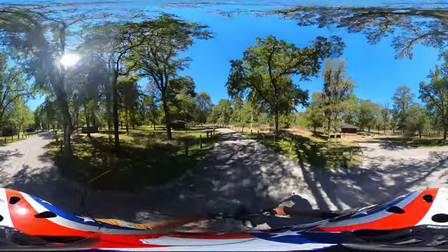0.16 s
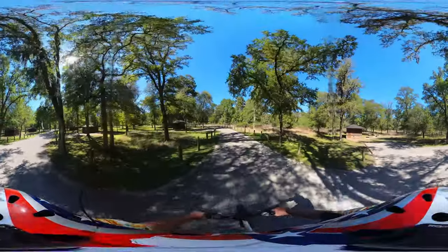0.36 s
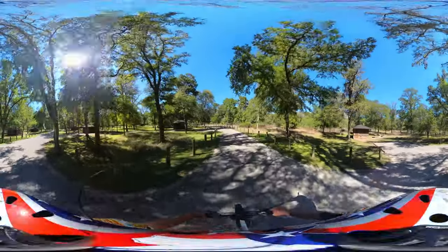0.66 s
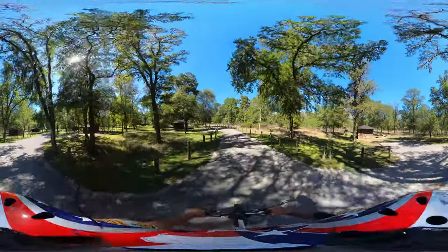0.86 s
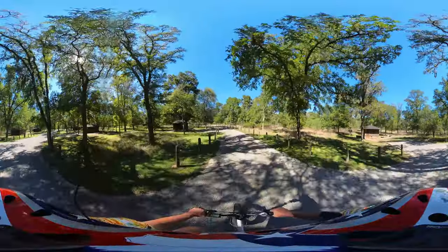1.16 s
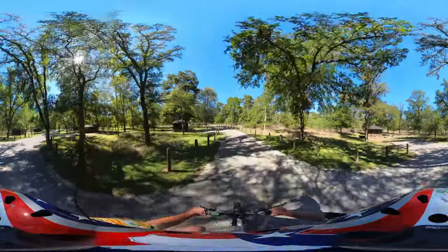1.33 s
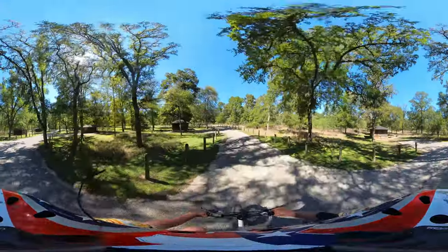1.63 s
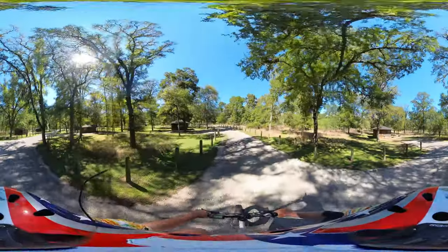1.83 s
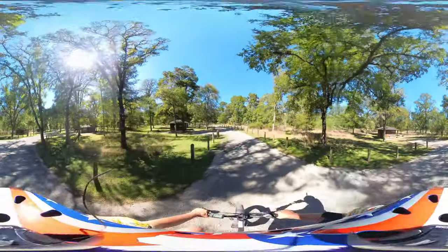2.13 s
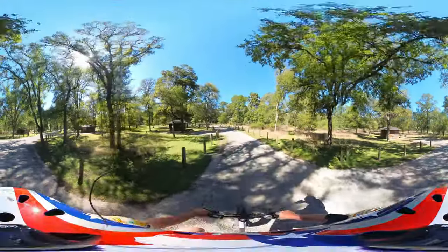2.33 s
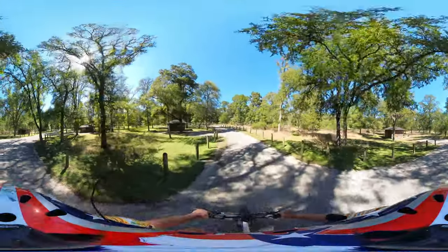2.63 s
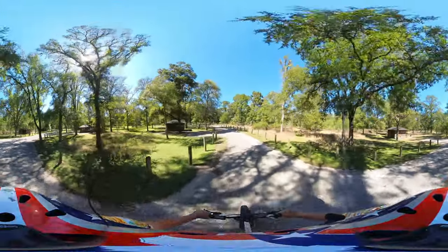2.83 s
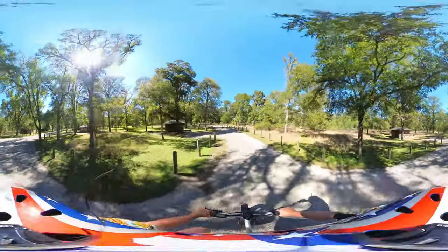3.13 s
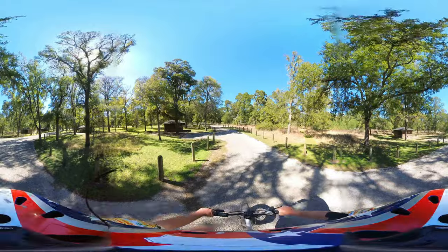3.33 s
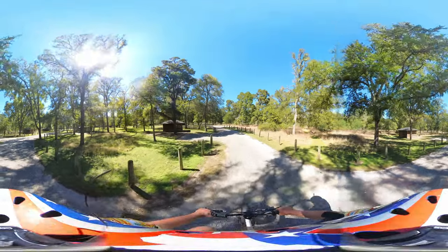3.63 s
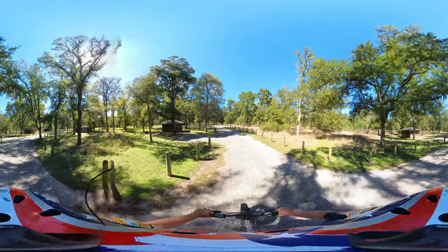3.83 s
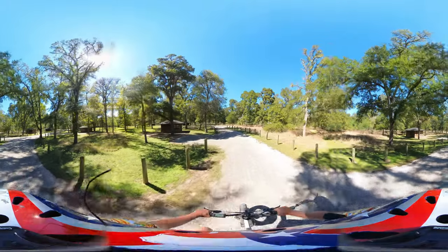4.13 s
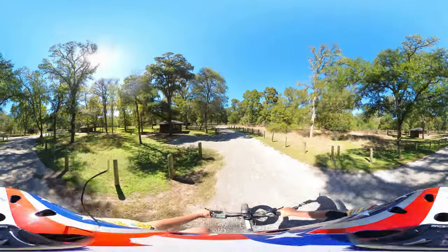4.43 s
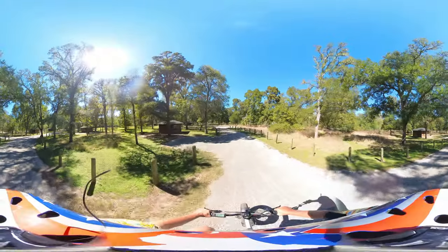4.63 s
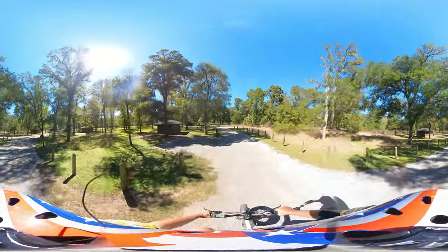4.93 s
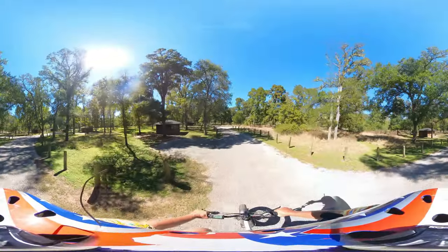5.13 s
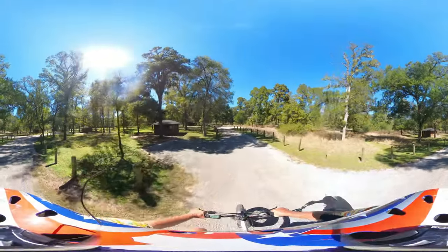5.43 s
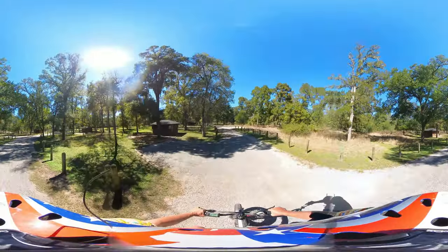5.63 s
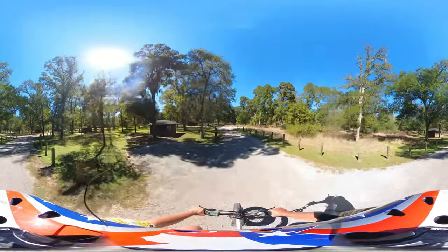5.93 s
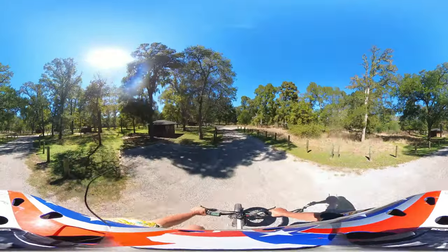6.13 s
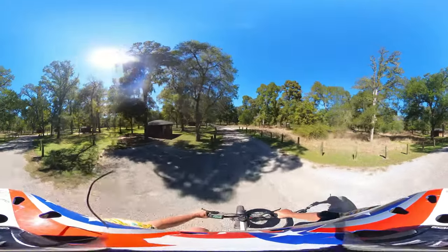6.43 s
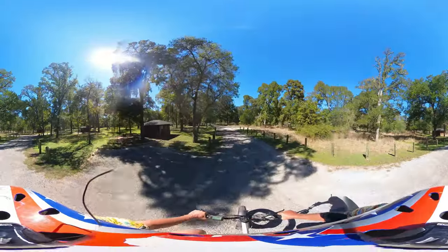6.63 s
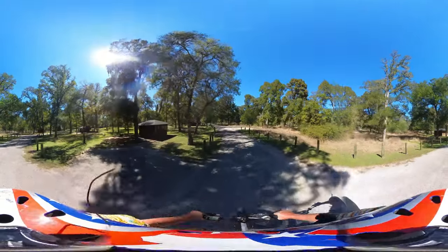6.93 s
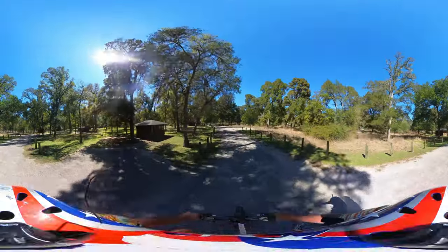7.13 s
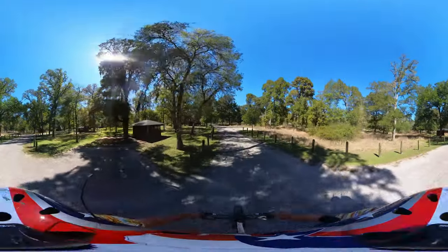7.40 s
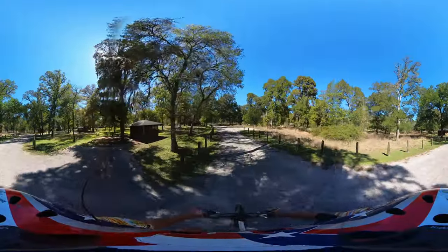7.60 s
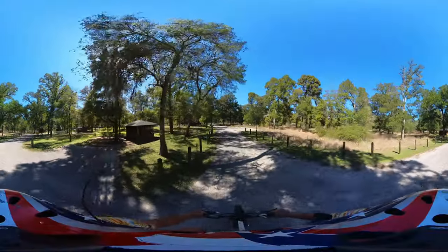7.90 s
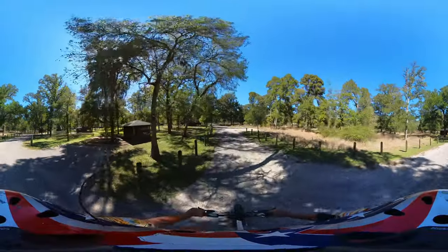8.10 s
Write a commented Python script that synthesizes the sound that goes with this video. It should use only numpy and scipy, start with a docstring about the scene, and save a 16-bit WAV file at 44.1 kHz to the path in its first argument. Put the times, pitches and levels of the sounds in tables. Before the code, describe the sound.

Outdoors on a gravel road, a bicycle coasts along. Low, muttering tyre crunch runs throughout beneath lumpy, low wind noise at the microphone. Glassy high brake squeaks and tiny chirps recur every half second, varying in strength. Stones click and tock, most sharply near one second and just after seven, and a few dull thuds come from ruts. Wind calms later and returns slightly at the end.

```python
"""Bicycle tyres coast along a gravel road, heard close up from a camera microphone on the rider's helmet.
Random impacts through the tread's colour make the crunch; pebble ticks make the grit, single blows the stones.
Shaped noise makes the wind at the microphone. A slightly warped brake disc rubs its pads in gliding tones:
a run of squeaks and a higher chirp on most turns of the wheel, thrown back by near surfaces and later by trees.
Stones click, ruts thud, and a faint wavering whirr comes and goes."""
import sys
import numpy as np
from scipy import signal
from scipy.fft import rfft, irfft
from scipy.io import wavfile
from scipy.ndimage import uniform_filter1d

SR = 44100
rng = np.random.default_rng(int(sys.argv[2]) if len(sys.argv) > 2 else 0)


def generate_wav(signal):
    """Clip the signal to [-1, 1] and save it as 16-bit WAV at the path in sys.argv[1]."""
    frames = np.transpose(np.atleast_2d(signal))
    scaled = np.clip(frames, -1, 1) * 32767
    pcm = np.round(scaled).astype(np.int16)
    wavfile.write(sys.argv[1], SR, pcm)


N = 364266
T = np.arange(N) / SR  # time/s

# Levels marked "rel." are trimmed further where they are used.
# ground under the tyres: [t/s, crunch level/dB rel., loose grit level/dB rel.]
ROAD_SURFACE = [(0, -39, -70.5), (0.6, -41, -70), (1.1, -41, -69.5), (1.8, -42.5, -77), (2.4, -43, -74),
                (2.7, -44, -79.5), (2.88, -42.5, -69.5), (3.05, -42, -75.5), (3.75, -43.5, -78),
                (4.6, -42, -74.5), (4.87, -43, -68), (5.05, -41, -80.5), (5.35, -43, -75),
                (5.55, -42.5, -80), (7.6, -41, -73.5), (8.25, -40, -69.5)]
# air on the microphone: [t/s, buffeting level/dB rel.]
WIND_LEVELS = [(0, -23.5), (0.66, -22.5), (0.85, -26.5), (1.57, -28), (1.77, -25.5), (2.15, -23.5),
               (2.22, -31.5), (2.48, -30), (2.56, -24), (2.92, -24), (3.3, -30.5), (3.64, -24),
               (3.95, -32.5), (4.7, -36.5), (5.2, -34.5), (6.25, -38), (7.25, -31.5), (8.25, -28)]
# short gusts on top of it: [t/s, half length to 1/e in s, rise/dB]
SHORT_GUSTS = [(0.697, 0.054, 3.5), (3.153, 0.026, 7), (6.698, 0.085, 8.5), (8.067, 0.018, 8.5)]
# turns of the wheel, timed where the warp of the disc meets the pad:
# [t/s, lead-in level/dB, squeak level at the warp/dB, drag afterwards level/dB, chirp level/dB rel.]
WHEEL_TURNS = [(0.047, -70, -56, -71, -41), (0.516, -51, -66, -64, -42.5), (0.996, -49, -38.5, -48.5, -41),
               (1.473, -68, -62, -48, -49.5), (1.957, -50.5, -26.5, -41.5, -48),
               (2.438, -70, -57, -66, -46), (2.929, -55, -50, -56.5, -46.5), (3.411, -54, -35, -36.5, -41),
               (3.884, -45.5, -32, -62, -39.5), (4.379, -44, -31.5, -52, -52),
               (4.862, -32.5, -26, -40.5, -66), (5.355, -56, -43.5, -52.5, -44.5),
               (5.839, -50, -42.5, -53.5, -41), (6.306, -51, -36, -35.5, -40), (6.764, -43, -54, -51, -49),
               (7.226, -45, -35.5, -58, -66), (7.675, -53, -37.5, -48, -66), (8.131, -59, -66, -75, -73)]
# thin stray peeps: [t/s, level/dB rel., f/Hz]
STRAY_PEEPS = [(5.621, -58, 10000), (5.708, -54, 9900), (5.709, -54, 8300), (5.775, -58, 8070),
               (6.895, -50, 9850), (7.015, -54.5, 10120)]
# modes the disc rings with: [f/Hz, level/dB rel., t60/s]
DISC_MODES = [(6970, 20, .2), (7300, 14, 0.26), (7462, -9, .2), (7600, -3.5, .25)]
# larger stones squeezed out from under a tyre: [t/s, peak level/dB rel.]
STONE_POPS = [(0.047, -23), (0.221, -22), (0.597, -21.5), (1.029, -10.5), (3.252, -18), (3.975, -27),
              (4.341, -26), (4.494, -27), (4.522, -23), (4.568, -24.5), (4.665, -29), (5.31, -22),
              (5.393, -26.5), (6.095, -25), (7.177, -25), (7.3, -7), (7.53, -23), (7.708, -28.5),
              (7.824, -25), (7.919, -27), (8.004, -23), (8.115, -23), (8.241, -14.5)]
# stones that click on each other or on the bike: [t/s, clack level/dB rel., tick level/dB rel.]
STONE_CLICKS = [(0.5236, -36, -58), (0.551, -40, -51.5), (0.64, -37, -44.5), (0.696, -38.5, -67),
                (0.9066, -37, -58), (1.0303, -40, -52), (2.0557, -45.5, -54.5), (2.2273, -64, -54.5),
                (3.0683, -35, -48.5), (3.1814, -40.5, -61), (3.2723, -47, -59), (3.3186, -50, -56),
                (4.341, -42, -57), (4.5226, -44.5, -59), (4.568, -41, -62), (4.9434, -49, -54),
                (5.3093, -48, -64), (6.7675, -51, -61), (7.1766, -52, -54.5), (7.301, -29.5, -42.5),
                (7.3756, -40.5, -52.5), (7.4562, -39, -51)]
# knocks of the wheel into ruts: [t/s, peak level/dB]
RUT_BUMPS = [(.690, -11), (2.014, -8.5), (5.881, -14.5)]
# spells of a thin whirr, perhaps insects in the trees: [start t/s, length/s, level/dB rel.]
WHIRR_SPELLS = [(3.1, 0.57, -69), (4.05, 0.47, -74.5), (5.407, 0.49, -73.5), (5.943, .6, -70)]

# Colours, all [f/Hz, spectral density level/dB rel.]
# mutter of the tyre casing on the gravel
CRUNCH_COLOUR = [(150, -20), (330, -4.5), (410, 6.5), (500, 2), (720, -2.5), (950, -2), (1170, -3),
                 (1500, -17.5), (1900, -23.5), (2600, -38), (4000, -76)]
# loose grit
GRIT_COLOUR = [(1500, -7), (2200, 4), (2900, -1.5), (3600, -0.5), (4300, -6.5), (6000, -3.5), (6700, -4),
               (8300, -0.5), (9600, -1.5), (10500, -12), (11500, -23.5)]
# wind buffeting
BUFFET_COLOUR = [(40, -24.5), (90, -1), (130, 1.5), (190, -0.5), (260, -6.5), (340, -18.5), (500, -24.5),
                 (900, -36.5), (2000, -79)]
# deep wind rumble
RUMBLE_COLOUR = [(10, -38.5), (25, -12), (38, 0), (52, 5.5), (80, -2.5), (120, -12.5)]
# tyre casing answering a popped stone
POP_COLOUR = [(100, -23), (400, -10.5), (650, -4.5), (1000, 1), (1230, -1), (1500, -12.5), (2000, -20.5),
              (3200, -35)]
# body of a clicking stone
STONE_COLOUR = [(1200, 7.5), (2500, -10.5), (4000, -4), (5500, -1.5), (7500, 0.5), (9000, -16)]
# sharp edge of a stone, also the hiss of the pad
CHIP_COLOUR = [(4000, -33), (7000, -6), (8500, 6), (9700, 2), (10700, -10), (12000, -26), (15000, -59)]

# spray of grit after each click: level against the clack/dB, decay to 1/e in s
SPRAY_DB, SETTLE_S = -35.5, 0.066
# from the start of a brake tone to the middle of its swell
LEAD_S = .04
SPOKES = 8
# the rub builds quickly towards the warp and lets go slowly, both in dB per spoke;
# after the warp no two spokes rub alike (random spread/dB)
BUILD_DB, RELEASE_DB, UNEVEN_DB = 14.5, 3, 1
# away from the warp the spokes only graze the pad: lowest rub level/dB
GRAZE_DB = -64.5
# the pad slips into a higher chirp just after the squeak at the warp
CHIRP_HZ, CHIRP_AFTER_S = 8350, .03
# and scrapes briefly just before it; level against that squeak/dB rel.
SCRAPE_HZ, SCRAPE_BEFORE_S, SCRAPE_DB = 7550, 0.024, -18.5
# smaller stones pop at random: how many, and their range of peak levels/dB rel.
SMALL_POPS, SMALL_POP_DB = 18, (-38.5, -29)
# upper band limit of the camera
EDGE_HZ = 14500


def amp(db):
    """Decibels to gain."""
    return 10 ** (np.asarray(db) / 20)


def unit(x):
    """Scales to rms 1."""
    return x / np.sqrt(np.mean(x ** 2) + 1e-20)


def curves(rows):
    """Each column of a table of times, interpolated at every sample."""
    s, *columns = np.transpose(rows)
    return [np.interp(T, s, column) for column in columns]


def add(mix, s, sound):
    """Lays a sound into the mix at a time."""
    part = mix[max(round(s * SR), 0):][:len(sound)]
    part += sound[:len(part)]


def blows(rows, response):
    """One response, peak 1, struck once for each row."""
    out = np.zeros(N)
    for s, db in rows:
        add(out, s, amp(db) * response / abs(response).max())
    return out


def ring(points, size=4096):
    """The causal impulse response of a colour, energy 1; it falls away steeply above its last point."""
    f, db = np.transpose(points)
    hz = abs(np.fft.fftfreq(size, 1 / SR))
    skirt_db = np.clip(60 * np.log2((hz + 1) / f[-1]), 0, 80)
    log_gain = np.log(amp(np.interp(np.log(hz + 1), np.log(f), db) - skirt_db))
    # minimum phase: the Hilbert transform of the log gain
    spectrum = np.exp(np.conj(signal.hilbert(log_gain)))
    response = np.fft.ifft(spectrum).real[:size // 2]
    response = response * np.hanning(size)[size // 2:]
    return response / np.linalg.norm(response)


def through(x, response):
    """Convolves and keeps the length."""
    return signal.oaconvolve(x, response)[:len(x)]


def shaped_noise(gain):
    """White noise weighted by a gain at each frequency, rms 1."""
    return unit(irfft(rfft(rng.standard_normal(N)) * gain, N))


def wander(rate_hz):
    """Smooth chance of rms 1, up to about a rate."""
    hz = np.fft.rfftfreq(N, 1 / SR)
    return shaped_noise(np.exp(-(hz / rate_hz) ** 2))


def band(centre_hz, width_hz):
    """Noise in one smooth resonance, rms 1."""
    hz = np.fft.rfftfreq(N, 1 / SR)
    return shaped_noise(np.exp(-.5 * ((hz - centre_hz) / width_hz) ** 2))


def scatter(t60, delay):
    """A tail of random echoes, energy 1; it starts after a delay/s and dies over t60/s."""
    t = T[:SR // 2]
    tail = rng.standard_normal(len(t)) * amp(-60 * t / t60) * (t > delay)
    return tail / np.linalg.norm(tail)


def patchy(x, depth_db, size=256):
    """Lets the colour drift: each narrow band swells and sinks on its own."""
    bands = signal.stft(x, nperseg=size)[2]
    field = rng.standard_normal(bands.shape)
    field = uniform_filter1d(field, size=3, axis=0)
    field = uniform_filter1d(field, size=36, axis=1)
    return signal.istft(bands * amp(depth_db * unit(field)), nperseg=size)[1][:N]


def grains(per_s, spread_db):
    """Random tiny impacts, most small and a few large, rms 1."""
    hits = rng.random(N) < per_s / SR
    signs = rng.choice([-1, 1], N)
    sizes = amp(spread_db * np.minimum(rng.exponential(1, N), 4))
    return unit(hits * signs * sizes)


def pebbles(count=32):
    """Each size of pebble ticks at its own pitch for a few cycles, and rattles against its neighbours."""
    t = T[:SR // 100]
    out = np.zeros(N)
    for hz in rng.uniform(2000, 10700, count):
        tick = np.sin(2 * np.pi * hz * t) * t * np.exp(-t / 0.0001)
        rattle = np.convolve(tick, scatter(t60=0.024, delay=0)[:SR // 16])
        out += through(grains(per_s=36, spread_db=3.5), rattle)
    return unit(out)


def tyres():
    """Stones shift under the tread: the casing mutters, grit crackles in clumps and sprays after each click."""
    crunch_db, grit_db = curves(ROAD_SURFACE)
    clump = wander(19.4)
    tread = unit(grains(per_s=1400, spread_db=3.0) + .5 * rng.standard_normal(N))
    crunch = through(tread, ring(CRUNCH_COLOUR)) * amp(crunch_db + 2.5 + 1.31 * clump)
    dust = patchy(rng.standard_normal(N), depth_db=7) * amp(0.7)
    crackle = pebbles() * amp(-1 + 6.14 * clump)
    spray_rows = [(s, db + SPRAY_DB) for s, db, _ in STONE_CLICKS]
    spray = blows(spray_rows, np.exp(-T[:SR // 2] / SETTLE_S))
    grit = through(dust + crackle, ring(GRIT_COLOUR)) * np.hypot(amp(grit_db), spray)
    return crunch + grit


def wind(rumble_db=-32, rumble_share=0.76, eddies_db=-12, eddies_hz=270):
    """Air shed by the helmet: lumpy buffeting over deep rumble; strong gusts tear into smaller, higher eddies."""
    buffet_db = curves(WIND_LEVELS)[0]
    for s, length, rise_db in SHORT_GUSTS:
        buffet_db = buffet_db + rise_db * np.exp(-((T - s) / length) ** 2)
    gust_db = buffet_db - buffet_db.mean()
    buffet = unit(through(rng.standard_normal(N), ring(BUFFET_COLOUR)))
    buffet *= amp(buffet_db - 0.5 + 2.36 * wander(31))
    rumble = unit(through(rng.standard_normal(N), ring(RUMBLE_COLOUR, size=16384)))
    rumble *= amp(rumble_db + rumble_share * gust_db)
    # eddies rise a little more than the buffeting does
    eddies = band(eddies_hz, width_hz=84.4)
    eddies *= amp(buffet_db + eddies_db + 0.12 * gust_db + 3.03 * wander(11.6))
    return buffet + rumble + eddies


def rubs():
    """Each spoke of the disc passes the pad once a turn, usually hardest at the warp: rows [t/s, level/dB]."""
    periods = np.gradient([turn[0] for turn in WHEEL_TURNS])
    rows = []
    for (s, lead_db, warp_db, drag_db, _), period in zip(WHEEL_TURNS, periods):
        step = period / SPOKES
        for k in range(SPOKES // 2 - 1):
            rows.append((s - (k + 1) * step, lead_db - BUILD_DB * k))
        rows.append((s, warp_db))
        for k in range(SPOKES // 2):
            uneven_db = UNEVEN_DB * rng.standard_normal()
            rows.append((s + (k + 1) * step, drag_db - RELEASE_DB * k + uneven_db))
    return [(s, max(db, GRAZE_DB)) for s, db in rows if s > LEAD_S]


def high_slips(scatter_share=0.0053):
    """Scrape before and chirp after each turn's squeak at the warp, and peeps: rows [t/s, level/dB rel., f/Hz]."""
    rows = list(STRAY_PEEPS)
    for s, _, warp_db, _, chirp_db in WHEEL_TURNS:
        rows.append((s - SCRAPE_BEFORE_S, warp_db + SCRAPE_DB, SCRAPE_HZ))
        chirp_hz = CHIRP_HZ * (1 + scatter_share * rng.standard_normal())
        rows.append((s + CHIRP_AFTER_S, chirp_db, chirp_hz))
    return rows


def slip(hz, length, waver, flutter_db, glide, points):
    """One stick-slip tone that swells, shakes through random points and dies; returns the tone and its swell."""
    t = T[:round(2 * LEAD_S * SR)] - LEAD_S
    shake, flutter = (unit(signal.resample(rng.standard_normal(points), len(t))) for _ in range(2))
    phase = 2 * np.pi * np.cumsum(hz * (1 + waver * shake + glide * t)) / SR
    swell = np.exp(-.5 * (t / length) ** 2) * amp(flutter_db * flutter)
    swell /= np.sqrt(np.mean(swell[abs(t) < length] ** 2))
    return np.sin(phase) * swell, swell


def modes(table):
    """Dying sines, energy 1."""
    t = T[:SR // 2]
    response = sum(amp(db - 60 * t / t60) * np.sin(2 * np.pi * hz * t) for hz, db, t60 in table)
    return response / np.linalg.norm(response)


def brake(squeak_hz=7105, ring_db=-18.0, hiss_db=-33, near_db=-9):
    """The pad catches the turning disc, which squeaks, hisses a little and rings on."""
    squeaks, chirps, contact = np.zeros((3, N))
    for s, db in rubs():
        hz = squeak_hz * (1 + 0.0018 * rng.standard_normal())
        tone, swell = slip(hz, length=0.0095, waver=0.0058, flutter_db=5.0, glide=0.17, points=18)
        add(squeaks, s - LEAD_S, amp(db) * tone)
        add(contact, s - LEAD_S, amp(db) * swell)
    for s, db, hz in high_slips():
        tone, _ = slip(hz, length=0.006, waver=0.024, flutter_db=4.5, glide=0.24, points=64)
        add(chirps, s - LEAD_S, amp(db - 3.0) * tone)
    friction = contact * rng.standard_normal(N)
    ringing = amp(ring_db) * through(friction, modes(DISC_MODES))
    hiss = amp(hiss_db) * through(friction, ring(CHIP_COLOUR))
    overtone = .17 * squeaks ** 2  # squaring: only hard squeaks reach the octave
    direct = squeaks + overtone + chirps + hiss
    # frame, rider and ground throw the sound back at once, the trees later
    near = through(direct, scatter(t60=0.2, delay=0.0021))
    far = through(amp(-18) * squeaks + amp(-26.0) * chirps, scatter(t60=0.3, delay=0.07))
    return direct + ringing + amp(near_db) * near + far


def pops(rise=0.00016):
    """A stone snaps free and the tyre casing answers with a dead 'tock'; wheel and ground reflect it."""
    t = T[:SR // 200]
    push = (t / rise) * np.exp(-t / rise)  # rubber takes the blow softly
    small = []
    for when, size in rng.random(size=(SMALL_POPS, 2)):
        small.append((when * T[-1], np.interp(size, [0, 1], SMALL_POP_DB)))
    tock = blows(STONE_POPS + small, np.convolve(ring(POP_COLOUR), push)) * amp(3.0)
    return tock + amp(-7) * through(tock, scatter(t60=0.018, delay=0.0017))


def clicks():
    """Each stone chatters for a few milliseconds: its body gives the clack, its sharp edge the tick."""
    t = T[:SR // 12]
    body, edge = np.zeros((2, N))
    # a quick decay over a weaker, slower one
    fade = amp(-60 * t / 0.021) + amp(-12.0) * amp(-60 * t / 0.09)
    for s, clack_db, tick_db in STONE_CLICKS:
        chatter = rng.standard_normal(len(t)) * fade
        add(body, s, amp(clack_db) * chatter)
        add(edge, s, amp(tick_db) * chatter)
    clack = amp(-1) * through(patchy(body, depth_db=2.5), ring(STONE_COLOUR))
    tick = amp(8.5) * through(edge, ring(CHIP_COLOUR))
    return clack + tick


def bumps(hz=160, decay=0.0014):
    """A rut jolts the bike: a soft, low, quickly damped thud."""
    t = T[:SR // 10]
    thud = np.sin(2 * np.pi * hz * t) * t ** 2 * np.exp(-t / decay)
    return blows(RUT_BUMPS, thud)


def whirr(hz=3370, waver=0.013, haze_hz=3200, haze_db=-4):
    """A faint, wavering line in a narrow haze; it swells and fades."""
    level = np.zeros(N)
    for s, length, db in WHIRR_SPELLS:
        add(level, s, amp(db) * signal.windows.tukey(round(length * SR)))
    pitch = hz * (1 + waver * wander(8.9) + waver * wander(60))
    line = np.sin(2 * np.pi * np.cumsum(pitch) / SR) * amp(-3 + 3 * wander(25))
    haze = amp(haze_db) * band(haze_hz, width_hz=180)
    return (line + haze) * level


def scene():
    """Everything that reaches the helmet, in one channel."""
    return (tyres() + wind() + brake() + pops() + clicks() + bumps() + whirr())[None]


def record(dry):
    """The camera's band limit: a steep low-pass."""
    low_pass = signal.firwin(511, EDGE_HZ, window=("kaiser", 9), fs=SR)
    return signal.oaconvolve(dry, low_pass[None], "same")


dry = scene()
out = record(dry)
generate_wav(out)
```